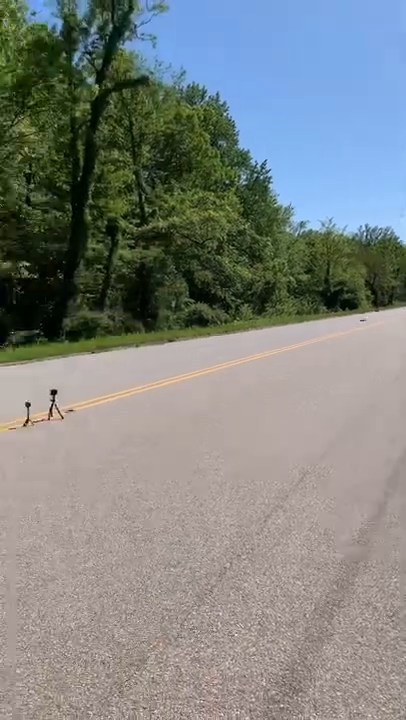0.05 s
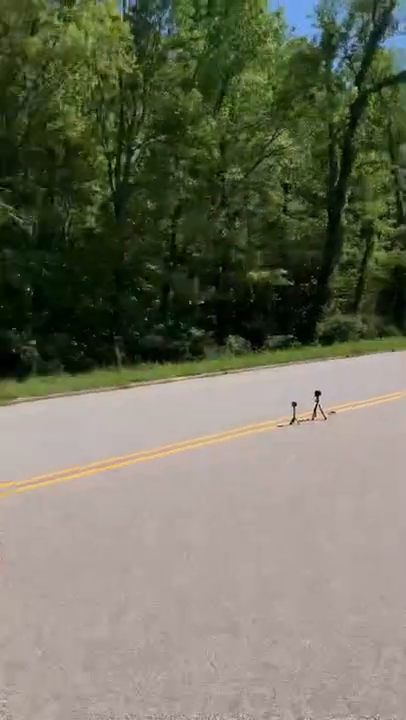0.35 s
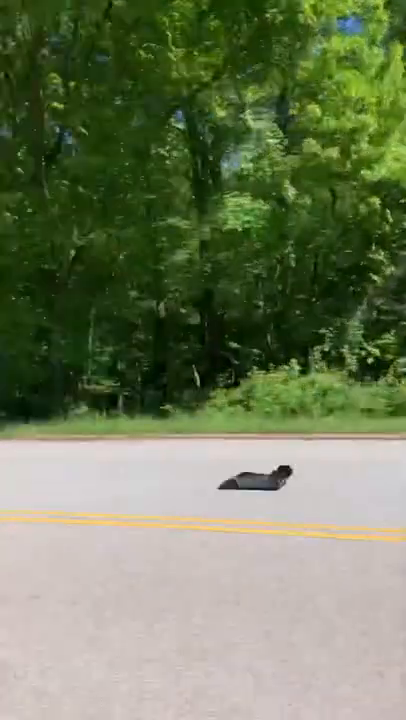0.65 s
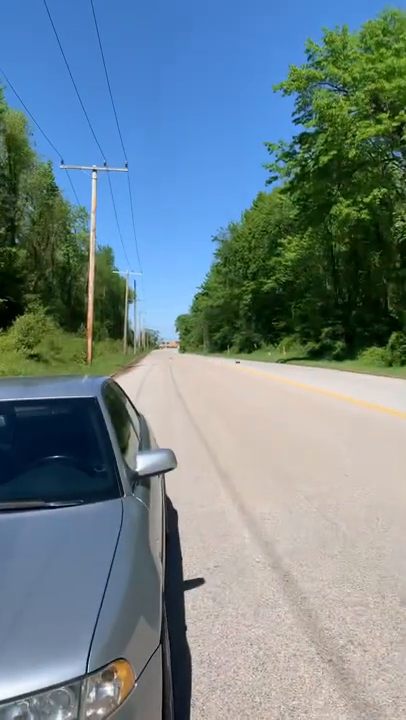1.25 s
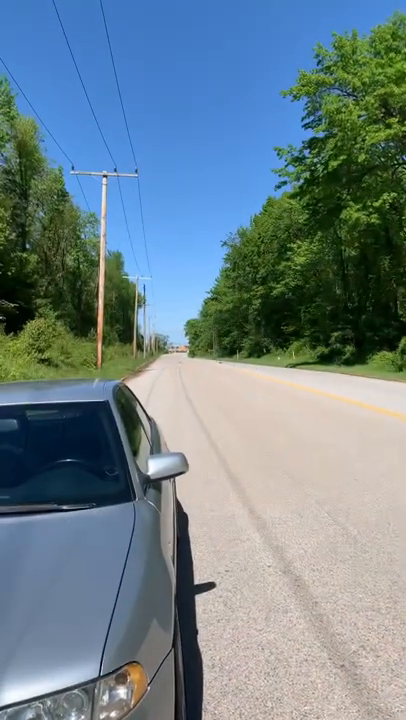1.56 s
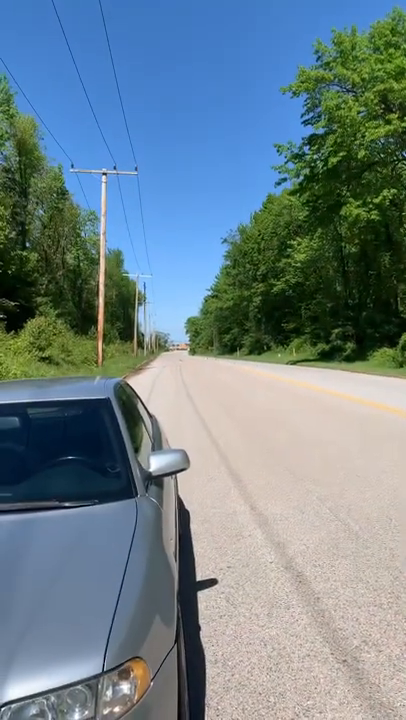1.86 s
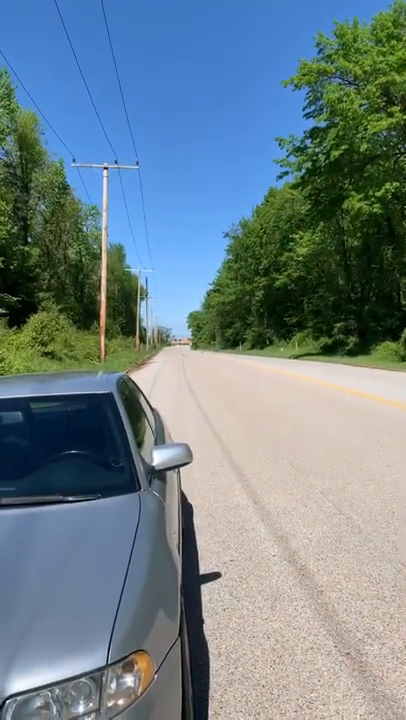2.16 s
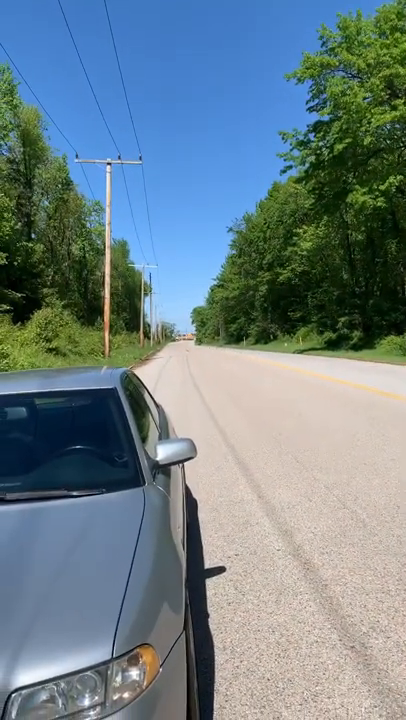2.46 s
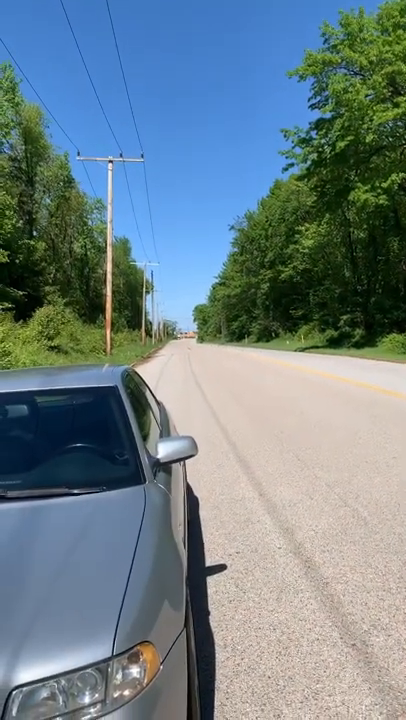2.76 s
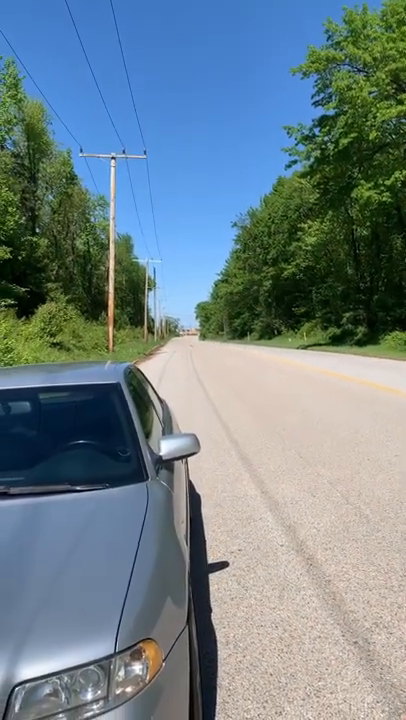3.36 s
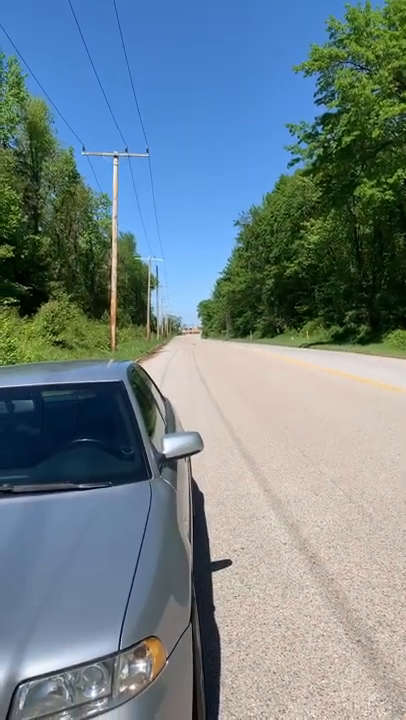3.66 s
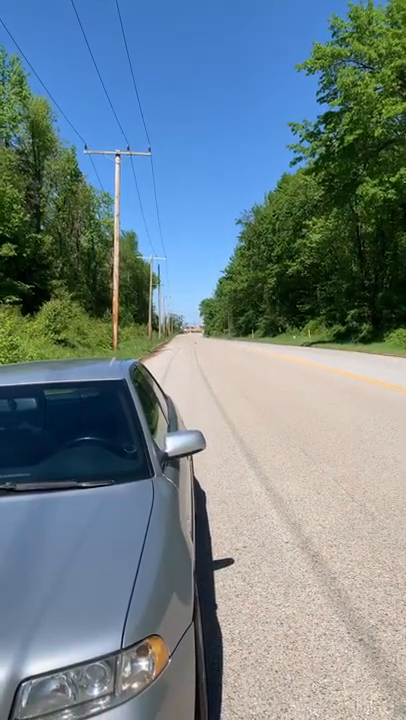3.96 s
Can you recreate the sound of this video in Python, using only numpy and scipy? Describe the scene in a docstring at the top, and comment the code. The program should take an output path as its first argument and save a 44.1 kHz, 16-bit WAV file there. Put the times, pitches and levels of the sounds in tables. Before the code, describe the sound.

A fast radio-controlled car whizzes by outdoors, its loud whir dropping in pitch and fading.

```python
"""A motor's whine, humming wheels and a rush of tyres and air swell over a low rumble: a radio-controlled
speed car shoots past a few metres away on a country road. Its tones follow the turning of the wheels
and fall in pitch by the Doppler effect. The tyres squeal and knock as it passes; from behind, the driven
pair slap the road once a turn in a hard buzz until the throttle closes. Trees echo it all."""
import sys
import numpy as np
from scipy import signal
from scipy.fft import rfft, irfft
from scipy.io import wavfile
from scipy.ndimage import map_coordinates

SR = 44100
rng = np.random.default_rng(int(sys.argv[2]) if len(sys.argv) > 2 else 0)


def unload_wav(signal):
    """Save mono or channel-first audio to the path in sys.argv[1] as 16-bit WAV at rate SR, clipped to [-1, 1]."""
    wavfile.write(
        sys.argv[1],
        SR,
        np.round(np.clip(np.atleast_2d(signal).T, -1, 1) * 32767).astype(np.int16),
    )


N = 176400

SPEED_M_S, PASSES_S, DISTANCE_M, SOUND_M_S = 72, .64, 5.3, 343
GEAR_RATIO = 3.333  # motor turns per turn of the rear wheels

# Levels are relative: each source adds its own gain.
# rotation of the driven rear wheels, which slip and grip, then coast (t/s, f/Hz)
REAR_ROTATION = [(0, 301), (.07, 285), (.12, 300), (.17, 301), (.22, 283), (.27, 298), (.31, 297),
                 (.365, 321), (.39, 286), (.42, 294), (.46, 279), (.55, 303), (.69, 297), (.745, 308),
                 (.805, 280), (.87, 305), (.925, 291), (.98, 300), (1.045, 291), (1.135, 316), (1.19, 294),
                 (1.235, 303), (1.31, 282), (1.4, 271), (2.1, 255), (4, 205)]
# rotation of the free front wheels (t/s, f/Hz)
FRONT_ROTATION = [(1.25, 399), (4, 305)]
# air roar and treble hiss (t/s, roar level/dB, hiss level/dB)
RUSH_LEVELS = [(0.02, -32, -47.5), (0.21, -23.5, -41.5), (0.28, -32, -38), (0.36, -23, -31),
               (0.53, -30.5, -21.5), (0.59, -23.5, -25.5), (0.8, -39, -33), (1.02, -54, -37),
               (1.08, -49, -46.5), (1.16, -50, -46), (1.42, -55, -55), (1.99, -66, -83), (3.9, -76.5, -98)]
# the whir: tyre rush and buzz together (t/s, level/dB)
WHIR_LEVEL = [(0, -30.5), (.3, -25.5), (.45, -22), (.49, -20), (.515, -26), (.54, -19.5), (.71, -24.5),
              (.76, -21.5), (.8, -21), (.85, -24), (.875, -19), (.9, -18.5), (.93, -24), (1.05, -30),
              (1.125, -34.5), (1.165, -25.5), (1.28, -37), (1.45, -39), (1.5, -49), (1.54, -41),
              (1.6, -46.5), (1.85, -45.5), (1.92, -51.5), (2.05, -49.5), (2.17, -58.5), (2.25, -52.5),
              (2.33, -58), (2.41, -51), (2.65, -59), (2.75, -57), (3.6, -61.5), (3.85, -64.5)]
# spectra of tyre rush, air roar and hiss (f/Hz, level/dB)
TYRE_SPECTRUM = [(500, -50.5), (900, -1.5), (1250, 3.5), (1600, -4.5), (1950, 5), (2400, 3), (3200, 4),
                 (4200, 2.5), (5000, -7), (6500, -11.5), (12000, -65.5)]
ROAR_SPECTRUM = [(30, -54), (120, -5), (300, -5.5), (650, -0.5), (950, -2), (1500, -4), (5000, -31)]
HISS_SPECTRUM = [(3000, -23), (4800, 4.5), (6000, 6.5), (7400, -2.5), (8800, -12), (10000, -5.5),
                 (12000, -13.5), (15000, -23)]
# flutter on the uneven road, evening out with distance (t/s, level spread/dB)
FLUTTER_DEPTH = [(1.5, 1.5), (2.6, .5)]
# wheel hum and motor whine (t/s, front level/dB, rear level/dB, motor level/dB)
TONE_LEVELS = [(0, -41, -49, -25), (.2, -32, -43, -27), (.4, -32, -43, -25), (.5, -36, -45, -37),
               (.54, -29, -44, -38), (.61, -28, -39, -38), (.7, -41, -44, -48), (1, -50, -56, -58),
               (1.27, -54, -59, -56), (1.42, -84, -84, -84)]
# wheel harmonics 1 to 4 (front level/dB, rear level/dB)
HUM_HARMONICS = [(-2, 2.5), (-8, -7.5), (-26.5, -15.5), (-17.5, -7)]
# envelope (t/s, level/dB) and spectrum (f/Hz, level/dB) of the rumble
RUMBLE_LEVEL = [(0.02, -53), (0.52, -43), (0.89, -48.5), (1.03, -71.5), (1.84, -59), (2.28, -62),
                (3.43, -58.5), (3.98, -62.5)]
RUMBLE_SPECTRUM = [(20, -10), (45, -14), (59, 4.5), (75, -2), (135, -7), (180, -15), (400, -28),
                   (2000, -62.5)]
# low and high bands of the echo from the trees (f/Hz, level/dB)
ECHO_LOW = [(150, -31.5), (500, 12.5), (1800, 9.5), (4000, -11.5)]
ECHO_HIGH = [(1500, -27), (3500, 28.0), (9000, -41)]
# front tyre squeals (middle t/s, length/s, level/dB) and their partials (harmonic number, level/dB)
SQUEAL_SWELLS = [(.488, .034, -19.5), (.57, .07, -30)]
SQUEAL_HARMONICS = [(4, -5), (6, 0)]
# knocks over bumps (t/s, peak level/dB)
BUMPS = [(.543, -3.5), (.683, -9), (.744, -7), (.758, -2.5)]
# spectrum of a tyre striking the road (f/Hz, level/dB)
SLAP_SPECTRUM = [(200, -39), (1250, -18), (1480, -1.5), (1980, -3), (2350, -12), (2700, -5.5), (3150, 2.5),
                 (3500, 2), (3950, -8), (4900, -11), (6200, -20), (15000, -52)]
# slaps grow ragged once the throttle closes (t/s, level spread/dB, timing spread/s)
SLAP_SPREAD = [(1.2, 1.6, .00002), (1.35, 3, .00006)]
# weighting of buzz against tyre rush (t/s, level/dB)
BUZZ_BALANCE = [(0, -31), (.62, -9), (.71, -3), (.76, 6), (.9, 10), (1.08, 7), (1.18, 9), (1.27, 1.5),
                (1.4, 1), (1.9, -8)]
# envelope (t/s, level/dB) and spectrum (f/Hz, level/dB) of the distant rolling
FAR_LEVEL = [(1.5, -85), (1.9, -52.5), (2.2, -56.5), (2.65, -59.5), (2.75, -55), (3.58, -61), (3.75, -67.5)]
FAR_SPECTRUM = [(500, -9), (950, 21.5), (1300, 18), (1850, 21.5), (2500, -28)]
# hum of the approach, thrown back late by distant trees (t/s, f/Hz, level/dB)
HUM_ECHO = [(1.5, 549.7, -71.5), (3.1, 507.8, -69), (3.6, 463.6, -75.5)]
# left microphone port relative to right: (f/Hz, phase/rad) and (f/Hz, level/dB)
PORT_PHASES = [(0, 0), (900, -1.7), (1200, -2.9), (1400, -6), (2350, -4), (2800, -5), (3500, -5),
               (4800, -3.14), (15500, 12.9)]
PORT_LEVELS = [(750, 0), (1280, -11), (1650, -6), (2100, -8), (2500, -.5), (5000, 0)]
# reflections reaching the ports (delay/s)
REFLECTION_LAGS = [.0031, .0074, .0137]


def undb(db):
    """Amplitude ratio of a level in decibels."""
    return 10 ** (np.asarray(db) / 20)


def unit(x):
    """Normalisation to rms 1."""
    return x / np.sqrt(np.mean(x ** 2))


def curve(table):
    """Linear interpolation of each column of a time table at every sample."""
    times, *columns = np.array(table, float).T
    return [np.interp(np.arange(N) / SR, times, column) for column in columns]


def response(points):
    """Magnitude response through (f/Hz, level/dB) points, on a logarithmic frequency axis."""
    hz, db = np.array(points, float).T
    return undb(np.interp(np.log(np.fft.rfftfreq(N, 1 / SR) + 1), np.log(hz), db))


def colour(x, points):
    """Zero-phase filtering by a spectrum, at rms 1."""
    return unit(irfft(rfft(x) * response(points), N))


def drift(bandwidth_hz):
    """Random modulation: low-passed Gaussian noise at rms 1."""
    lowpass = np.exp(-(np.fft.rfftfreq(N, 1 / SR) / bandwidth_hz) ** 2)
    return unit(irfft(rfft(rng.standard_normal(N)) * lowpass, N))


def tone(cycles, waver_db=1.3, smear_rad=0.14):
    """Random amplitude and phase modulation broaden a spectral line."""
    phase = 2 * np.pi * cycles + smear_rad * drift(50)
    return unit(np.sin(phase) * undb(waver_db * drift(21)))


def path():
    """Distance and Doppler factor: the changing travel time compresses, then stretches the waves."""
    sent_s = np.linspace(-2, 4, 6000)
    metres = np.hypot(SPEED_M_S * sent_s, DISTANCE_M)
    heard_s = PASSES_S + sent_s + (metres - DISTANCE_M) / SOUND_M_S
    return curve(np.c_[heard_s, metres, np.gradient(sent_s, heard_s)])


def motor_whine(rear_turns, level_db):
    """Gearing multiplies frequency: the motor sounds at a fixed multiple of the wheel rotation."""
    return undb(level_db) * tone(GEAR_RATIO * rear_turns)


def wheel_hum(front_turns, rear_turns, front_db, rear_db, metres):
    """Periodic rotation gives a harmonic series per axle; overtones gain up to 8 dB as the car nears."""
    brightness = undb(8 * DISTANCE_M / metres)
    hum = 0
    for k, (front_partial_db, rear_partial_db) in enumerate(HUM_HARMONICS, 1):
        front = undb(front_db + front_partial_db) * tone(k * front_turns)
        rear = undb(rear_db + rear_partial_db) * tone(k * rear_turns, waver_db=0, smear_rad=0.63)
        hum += (front + rear) * (brightness if k > 1 else 1)
    return hum


def tread(turns, points_per_turn=128, correlation=0.34):
    """Comb filtering: rolling noise partly repeats with every turn of a wheel."""
    grit = rng.standard_normal((int(turns[-1]) + 2, points_per_turn))
    grit = signal.lfilter([1], [1, -correlation], grit, axis=0)
    return unit(map_coordinates(grit.ravel(), [turns * points_per_turn], order=3, mode="wrap"))


def rush(front_turns, rear_turns, spectrum):
    """Broadband noise of both axles, amplitude-modulated by the uneven road."""
    noise = colour(tread(front_turns) + tread(rear_turns), spectrum)
    return noise * undb(curve(FLUTTER_DEPTH)[0] * drift(17.6))


def air_absorption(x, metres, db_per_m=0.0638):
    """Absorption in dB grows with distance and frequency squared; db_per_m holds at 10 kHz."""
    hz, times, frames = signal.stft(x, SR, nperseg=256)
    loss_db = db_per_m * np.outer((hz / 1e4) ** 2, np.interp(times * SR, np.arange(N), metres))
    return signal.istft(frames * undb(-loss_db), SR)[1][:N]


def rumble():
    """Filtered noise with its energy at low frequencies: an outdoor rumble."""
    return undb(curve(RUMBLE_LEVEL)[0]) * colour(rng.standard_normal(N), RUMBLE_SPECTRUM)


def tree_echo(x, low_t60_s=4.52, high_t60_s=1.45, build_s=0.086, level_db=-33.5):
    """Reverberation from the woods builds up, then decays exponentially, the treble first."""
    t = np.arange(N) / SR
    low = colour(rng.standard_normal(N), ECHO_LOW) * undb(-60 * t / low_t60_s)
    high = colour(rng.standard_normal(N), ECHO_HIGH) * undb(-60 * t / high_t60_s)
    echo = (low + high) * (1 - np.exp(-t / build_s))
    return undb(level_db) * signal.fftconvolve(x, echo / np.linalg.norm(echo))[:N]


def squeal(front_turns):
    """The front tyres sing briefly on two harmonics of their rotation."""
    t = np.arange(N) / SR
    swell = sum(undb(db) * np.exp(-(2 * (t - middle) / length) ** 4)
                for middle, length, db in SQUEAL_SWELLS)
    return swell * sum(undb(db) * tone(k * front_turns) for k, db in SQUEAL_HARMONICS)


def knocks():
    """Impulse excitation: each bump draws one hard crack from the tyres, ringing like a slap."""
    impulses = np.zeros(N)
    for at_s, db in BUMPS:
        impulses[int(at_s * SR)] = undb(db)
    gain = response(SLAP_SPECTRUM)
    return irfft(rfft(impulses) * gain, N) / np.mean(gain)


def slap_buzz(turns, delay_s_per_hz=3e-7):
    """A pulse train heard as a buzz: the driven tyres slap the road once a turn, a little unevenly."""
    spread_db, jitter_s = curve(SLAP_SPREAD)
    at = np.interp(np.arange(1, int(turns[-1])), turns, np.arange(N))
    chance = rng.standard_normal((len(at), 2))
    at += jitter_s[at.astype(int)] * SR * chance[:, 0]
    taps = at.astype(int)[:, None] + np.arange(-7, 9)
    spread_db = spread_db[taps % N]
    excess_db = spread_db ** 2 * np.log(10) / 20  # taken off to keep the mean power nearly steady
    strength = undb(spread_db * np.clip(chance[:, 1:], -2, 2) - excess_db)
    pulses = np.zeros(N)
    np.add.at(pulses, taps % N, np.sinc(taps - at[:, None]) * strength)
    chirp = np.exp(-1j * np.pi * delay_s_per_hz * np.fft.rfftfreq(N, 1 / SR) ** 2)  # highs trail lows
    return colour(irfft(rfft(pulses) * chirp, N), SLAP_SPECTRUM)


def far_rolling():
    """Band-limited noise of wavering level: dull rolling from far down the road."""
    level_db = curve(FAR_LEVEL)[0] + 0.64 * drift(17)
    return undb(level_db) * colour(rng.standard_normal(N), FAR_SPECTRUM)


def late_hum():
    """A blurred, falling tone stands for the hum's delayed reflection from distant trees."""
    hz, level_db = curve(HUM_ECHO)
    return undb(level_db) * tone(np.cumsum(hz) / SR, waver_db=2, smear_rad=.8)


def car():
    """Superposition of the car's sources; the Doppler factor scales the rotation of both axles."""
    metres, doppler = path()
    front_turns = np.cumsum(curve(FRONT_ROTATION)[0] * doppler) / SR
    rear_turns = np.cumsum(curve(REAR_ROTATION)[0] * doppler) / SR
    roar_db, hiss_db = curve(RUSH_LEVELS)
    front_db, rear_db, motor_db = curve(TONE_LEVELS)
    balance = undb(curve(BUZZ_BALANCE)[0])
    buzz = balance * undb(2) * slap_buzz(rear_turns)
    tyres = undb(3.5) * rush(front_turns, rear_turns, TYRE_SPECTRUM)
    whir = undb(curve(WHIR_LEVEL)[0]) * (buzz + tyres) / np.hypot(1, balance)
    roar = undb(roar_db + 2) * rush(front_turns, rear_turns, ROAR_SPECTRUM)
    hiss = undb(hiss_db + 3) * rush(front_turns, rear_turns, HISS_SPECTRUM)
    noise = air_absorption(whir + roar + hiss, metres)
    hum = wheel_hum(front_turns, rear_turns, front_db, rear_db, metres)
    return noise + hum + squeal(front_turns) + knocks() + motor_whine(rear_turns, motor_db)


def ports(x, diffuse_db=-9):
    """Two microphone ports differ in phase and level; shifting reflections reach each independently."""
    hz, radians = np.array(PORT_PHASES).T
    lead = np.exp(1j * np.interp(np.fft.rfftfreq(N, 1 / SR), hz, radians) / 2)
    tilt = response(PORT_LEVELS)
    gains = np.array([tilt * lead, 1 / lead]) * np.sqrt(2 / (1 + tilt ** 2))
    kernels = np.roll(irfft(gains, N), 256, axis=1)[:, :512]
    direct = signal.fftconvolve(x[None], kernels, axes=1)[:, 256:N + 256]
    midrange = signal.sosfilt(signal.butter(1, [600, 3500], "band", fs=SR, output="sos"), x)
    echoes = [np.pad(midrange, (int(lag * SR), 0))[:N] for lag in REFLECTION_LAGS]
    diffuse = np.array([sum(echo * drift(10.1) for echo in echoes) for _ in "LR"])
    return direct + undb(diffuse_db) * diffuse / np.sqrt(len(echoes))


def scene():
    """Direct sound, echoes and rumble add at the two ports."""
    direct = car()
    return ports(direct + tree_echo(direct) + far_rolling() + late_hum() + rumble())


def record(dry):
    """Band limiting: a steep low-pass filter cuts the treble above 15.1 kHz."""
    return signal.sosfilt(signal.ellip(8, .2, 70, 15100, fs=SR, output="sos"), dry)


dry = scene()
out = record(dry)
unload_wav(out)
```